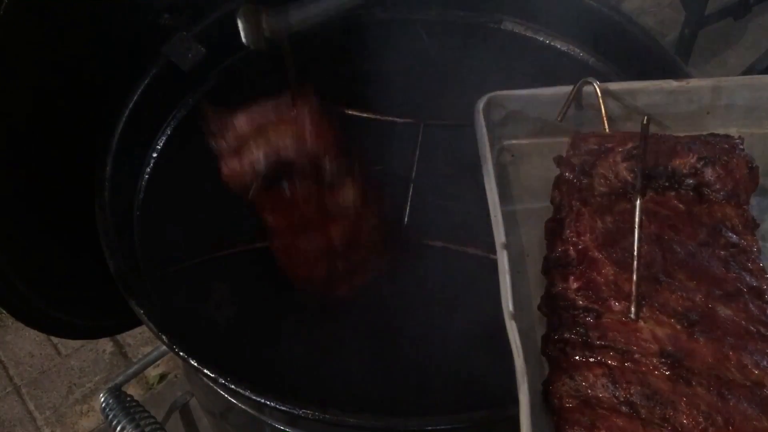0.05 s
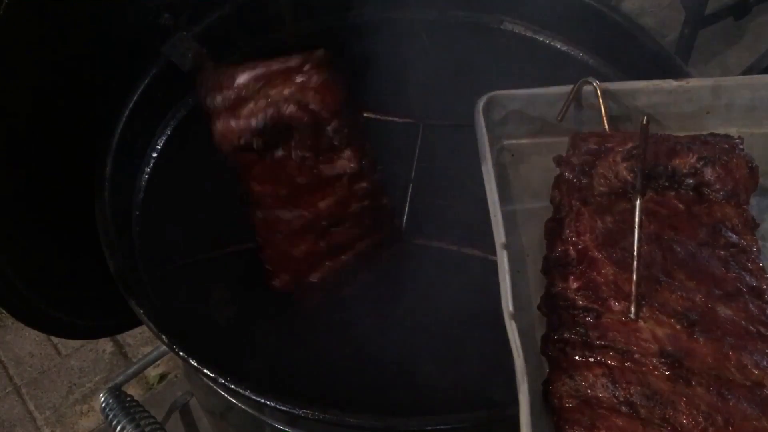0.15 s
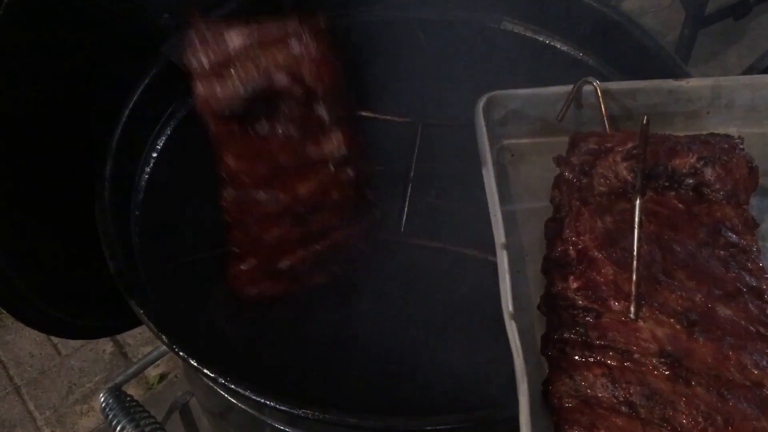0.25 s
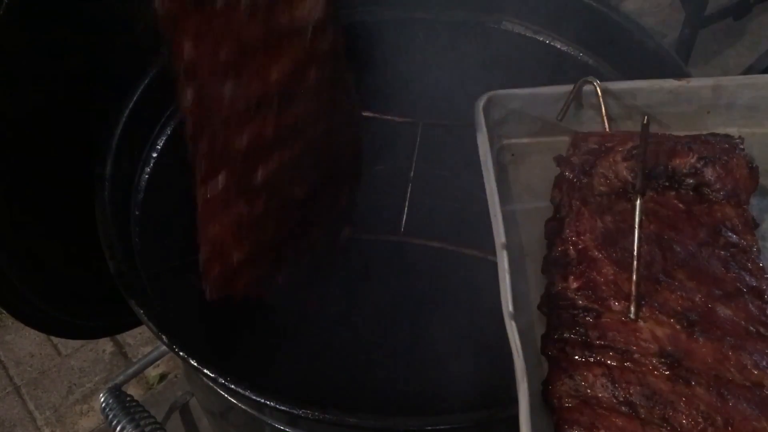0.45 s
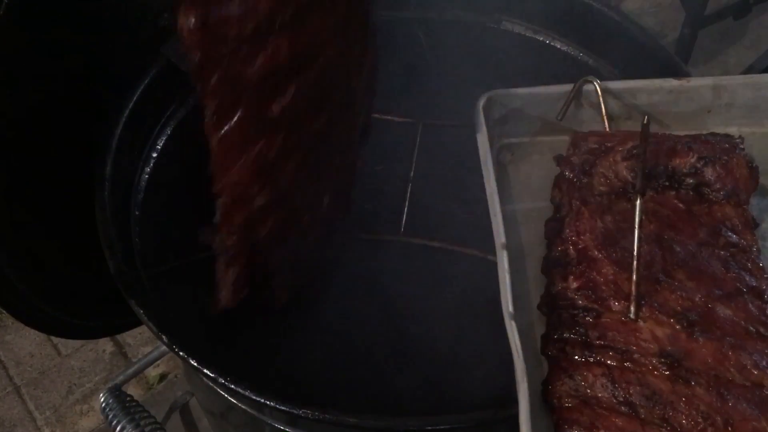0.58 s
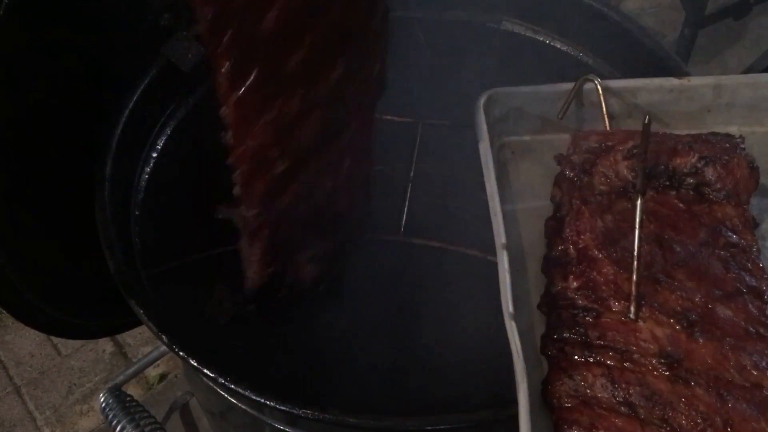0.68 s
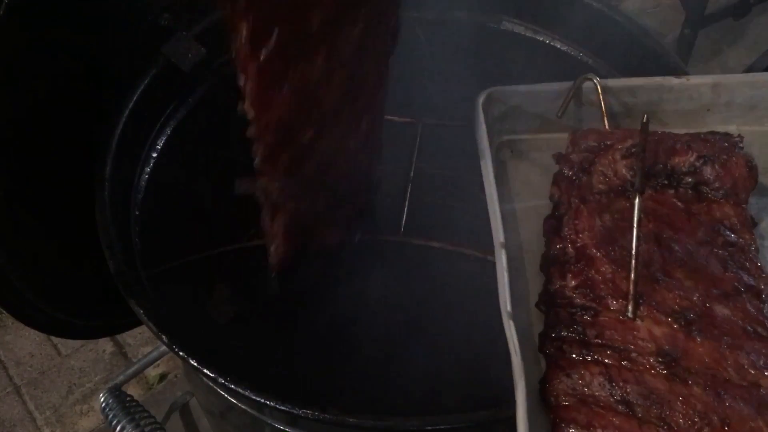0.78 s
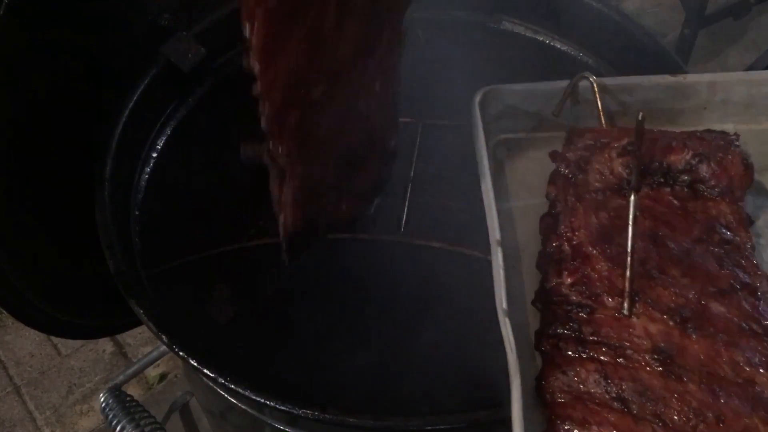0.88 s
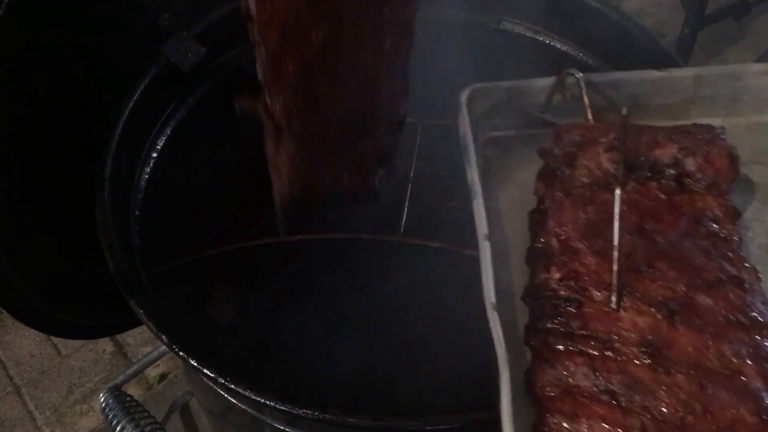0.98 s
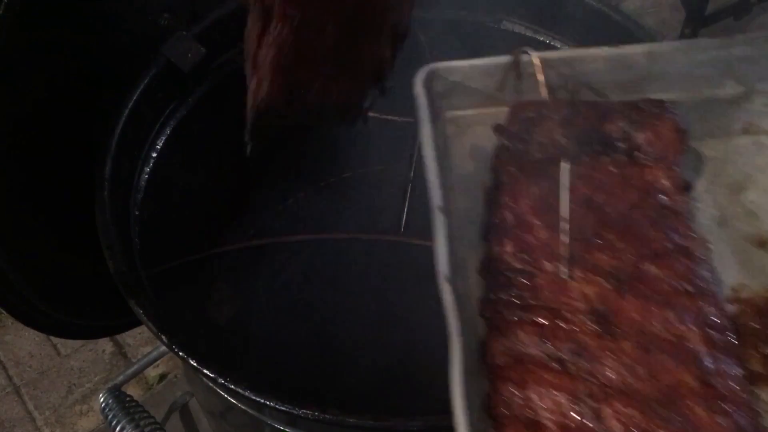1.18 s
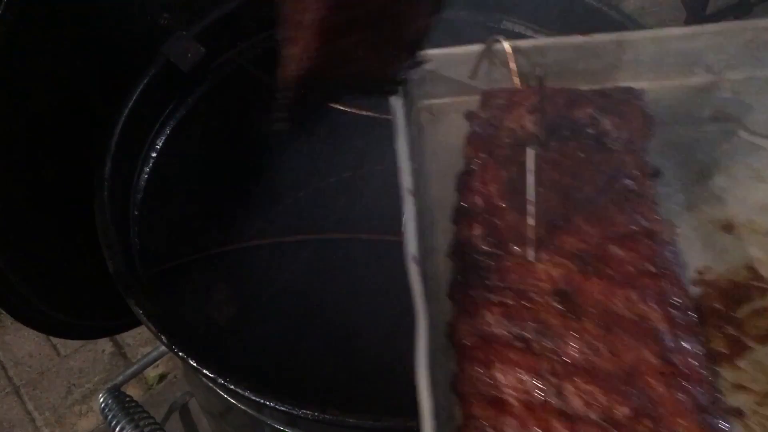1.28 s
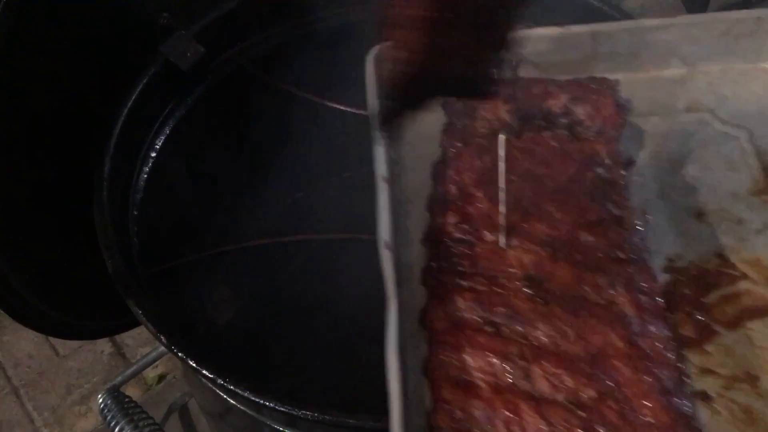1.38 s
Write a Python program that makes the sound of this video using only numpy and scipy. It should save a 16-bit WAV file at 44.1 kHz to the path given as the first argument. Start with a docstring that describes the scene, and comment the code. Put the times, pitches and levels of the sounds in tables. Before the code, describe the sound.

A metal hook clatters on a steel barrel, ringing, then clinks and soft rubbing, outdoors

```python
"""Hook knocks clatter on a hanging rod and set a steel barrel cooker ringing, outdoors, close to the microphone.
A rack of ribs is being lifted out: meat and air thump in the drum, and the hook clinks as it comes free.
A grainy rubbing hiss swells as meat and pan are moved, with a few brushes and a hollow drone of friction.
Steel blows are decaying noise plus wavering sine modes; the rest is shaped noise, over a low outdoor rumble."""
import sys
import numpy as np
from scipy import signal
from scipy.fft import rfft, irfft
from scipy.io import wavfile

SR = 44100
rng = np.random.default_rng(int(sys.argv[2]) if len(sys.argv) > 2 else 0)


def unload_audio(sound):
    """Save the sound as a 16-bit wav file, at the path given as the first command line argument."""
    columns = np.transpose(np.atleast_2d(sound))
    # keep every value between -1 and 1, then stretch to whole-number steps
    steps = np.round(np.clip(columns, -1, 1) * 32767)
    wavfile.write(sys.argv[1], SR, steps.astype(np.int16))


N = 63945
TIME, FREQ = np.arange(N) / SR, np.fft.rfftfreq(N, 1 / SR)


def amp(db):
    """Decibels to gain."""
    return 10 ** (np.asarray(db) / 20)


def unit(x):
    """Scales to rms 1."""
    return x / np.sqrt(np.mean(x ** 2) + 1e-20)


def read(points, hz):
    """Reads a table on a log-frequency axis."""
    f, value = np.transpose(points)
    return np.interp(np.log(hz + 1), np.log(f + 1), value)


def add(mix, s, sound):
    """Mixes a sound in at time s."""
    part = mix[max(round(s * SR), 0):][:len(sound)]
    part += sound[:len(part)]


def noise(gain):
    """Noise of rms 1 with the given gain at each frequency."""
    return unit(irfft(rfft(rng.standard_normal(N)) * gain, N))


def band(hz, width_hz):
    """Noise confined to one band; its gain is halved at width_hz either side of the centre."""
    return noise(1 / (1 + ((FREQ - hz) / width_hz) ** 4))


def swell(rise, decay):
    """A straight rise, then an exponential fall."""
    return np.minimum(TIME / rise, 1) * np.exp(-np.maximum(TIME - rise, 0) / decay)


def clatter():
    """The hook knocks on the rod and shakes the whole drum."""
    # knocks of the hook on rod and drum: start_s, level_db, rise_s, dull_above_hz
    knocks = [(.177, -25.5, 0.0054, 3320), (.218, -28.5, 0.0046, 2340), (.2452, -13, 0.0014, 6800),
              (.258, -17.5, 0.00067, 2770), (.2775, -19, 0.0015, 5500), (.286, -14.5, 0.00045, 16300),
              (.306, -18.5, 0.0011, 14200), (.3115, -15, 0.00043, 5730)]
    # dense overtones of the drum: frequency_hz, relative_db per Hz
    drum_spectrum = [(60, -21), (200, -15), (420, -7.5), (520, -16.5), (650, -0.5), (860, -3.5), (1120, -5),
                     (1800, 4), (2600, -1.5), (3700, 0), (4700, -8), (6200, -7.5), (7500, -10.5),
                     (9700, -6), (11500, -14.5), (15000, -8.5)]
    # ring time of those overtones: frequency_hz, t60_s
    drum_t60 = [(100, 1.8), (700, 2.22), (1500, 1.15), (3700, 0.87), (6000, 0.5), (12000, 0.28)]
    # clear modes of the drum: frequency_hz, relative_db, t60_s
    drum_modes = [(394, -19.5, 1.72), (574, -22, 2.67), (654.6, -9, .9), (697, -28.5, 2.7), (829, -3, 0.45),
                  (926, -7, 1.3), (1399.5, -2, 0.42), (1695, -5, .5), (1797, 4.5, 0.19), (1883, 5, 0.37),
                  (1988, 2, 0.22), (2340, 4.5, 0.16), (2468, 8, 0.17), (2666, -18, 0.45), (3370, 3, 0.25),
                  (3472, 5, 0.18), (3545, 5.5, 0.14), (4164, -24, 1), (4285, -4, 0.27), (5750, -14, 0.23),
                  (5940, 1, 0.13), (6180, 1, 0.21), (8800, -19, 0.23)]
    return struck(knocks, drum_spectrum, drum_t60, drum_modes, crash_db=1, wash_db=-16.0, modes_db=-18.0)


def hook():
    """The hook clinks and rings on above the open drum."""
    # clinks of the free hook: start_s, level_db, rise_s, dull_above_hz
    clinks = [(.4905, -24, 0.0011, 2180), (.6845, -26.5, 0.0012, 15000), (.6905, -20.5, 0.00084, 4900)]
    # dense overtones of the hook: frequency_hz, relative_db per Hz
    hook_spectrum = [(200, -31), (700, -13.5), (1400, -4.5), (2300, -2.5), (3200, -2), (3950, 5),
                     (4600, -15.5), (5500, -8.5), (6400, -3.5), (7400, -10), (8700, -5.5), (12000, -3),
                     (15500, -12)]
    # ring time of those overtones: frequency_hz, t60_s
    hook_t60 = [(500, 0.39), (1500, 0.67), (3700, 0.5), (9000, 0.37), (15000, 0.22)]
    # clear modes of the hook: frequency_hz, relative_db, t60_s
    hook_modes = [(1318, -7.5, 0.87), (1426, -13, .8), (1520, -5.5, 0.48), (1750, -6, 0.47),
                  (2406, -1, 0.36), (3020, -4.5, 0.19), (3740, 4.5, 0.21), (3874, 5, 0.1),
                  (3920, -10, 0.62), (5240, -8.5, 0.37), (6341, 1.5, 0.093), (6460, -8.5, 0.34),
                  (8060, -12, 0.3), (8850, -6, 0.36), (8700, -7, 0.15), (11940, -6, 0.18)]
    return struck(clinks, hook_spectrum, hook_t60, hook_modes, crash_db=-1, wash_db=-12.5, modes_db=-12)


def struck(blows, spectrum, t60, modes, crash_db, wash_db, modes_db):
    """Blows on a steel body: a short crash, a long wash and clear modes."""
    # the crash dies faster than the wash: frequency_hz, t60_s
    crash_t60 = [(300, 0.17), (2000, 0.2), (6000, 0.16), (14000, 0.096)]
    out = amp(modes_db) * ring(modes, blows)
    colour_db = read(spectrum, FREQ) + ripple()  # the same for every blow on this body
    for s, db, rise, dull_hz in blows:
        crash = amp(crash_db) * overtones(colour_db, crash_t60)
        wash = amp(wash_db) * overtones(colour_db, t60)
        add(out, s, contact(crash + wash, db, rise, dull_hz))
    return out


def overtones(spectrum_db, t60):
    """Countless overlapping modes, as noise with each band dying at its own speed."""
    hz, t, z = signal.stft(noise(amp(spectrum_db)), SR, nperseg=256)
    decay = np.exp(-np.log(1000) * t / read(t60, hz)[:, None])
    return signal.istft(z * decay, SR, nperseg=256)[1][:N]


def ring(modes, blows, waver=0.58, waver_hz=45):
    """Each blow adds energy to the clear modes, which waver as they die away."""
    hz, db, t60 = np.transpose(modes)[:, :, None]
    power = 0
    for s, level_db, rise, dull_hz in blows:
        t = np.maximum(TIME - s, 0)
        envelope = amp(level_db) * (1 - np.exp(-t / rise)) * np.exp(-np.log(1000) * t / t60)
        power = power + envelope ** 2 / (1 + (hz / dull_hz) ** 2)
    angle = 2 * np.pi * (hz * TIME + rng.random((len(modes), 1)))
    # two random drifts per mode bend both its strength and its phase
    knots = rng.standard_normal((2 * len(modes), 400))
    drift = waver * np.array([np.interp(TIME * waver_hz, np.arange(len(k)), k) for k in knots])
    waves = (1 + drift[::2]) * np.sin(angle) + drift[1::2] * np.cos(angle)
    return (amp(db) * np.sqrt(power) * waves).sum(0)


def contact(sound, db, rise, dull_hz):
    """A blow builds up over its rise time constant and loses treble above dull_hz."""
    b, a = signal.butter(1, min(dull_hz, SR / 2 - 500), fs=SR)
    return amp(db) * signal.lfilter(b, a, sound * (1 - np.exp(-TIME / rise)))


def ripple():
    """Random peaks and dips among a body's overtones, in dB; they lie wider apart in the treble."""
    depth_db, spacing_hz = 4, 26.23  # spacing of the random steps at 1 kHz
    steps = rng.standard_normal(4000)
    place = 2 * np.sqrt(1000 * FREQ) / spacing_hz
    return depth_db * np.interp(place, np.arange(len(steps)), np.clip(steps, -2, 2))


def bumps():
    """Meat bumps the drum wall, stirring one damped band at a time."""
    # bumps, level ahead of the wall filter: start_s, level_db, rise_s, centre_hz, decay_s
    meat_bumps = [(.2, -22.5, 0.00086, 794, 0.0074), (.213, -30.5, 0.0018, 830, 0.04),
                  (.254, -16.5, 0.0029, 784, 0.009), (.362, -24.5, 0.0011, 874, 0.013),
                  (.510, -36, .006, 1660, 0.045), (.521, -30, .006, 963, 0.02)]
    return thuds(meat_bumps, half_width=0.2)


def thumps():
    """The air in the drum thumps dully, in broader bands for their pitch."""
    # thumps, level ahead of the wall filter: start_s, level_db, rise_s, centre_hz, decay_s
    air_thumps = [(.265, -42.5, .012, 92, 0.052), (.34, -36.5, 0.007, 88.6, 0.051),
                  (.515, -43.5, 0.0048, 382, 0.054), (.56, -36.5, 0.013, 90, 0.03)]
    return thuds(air_thumps, half_width=0.37)


def thuds(rows, half_width):
    """Soft blows that stir only one damped band of the drum; half_width is a share of its centre."""
    out = np.zeros(N)
    for s, db, rise, hz, decay in rows:
        push = amp(db) * swell(rise, decay) * band(hz, half_width * hz)
        # an octave-wide filter around the centre
        wall = signal.butter(2, [hz / np.sqrt(2), hz * np.sqrt(2)], "bandpass", fs=SR, output="sos")
        add(out, s, signal.sosfilt(wall, push))
    return out


def snaps(width_hz=2800):
    """Tiny wet snaps and bright ticks: bursts of treble noise that start at once and die fast."""
    # snaps and ticks: start_s, level_db, decay_s, centre_hz
    ticks = [(.2045, -29, 0.0012, 11300), (0.2451, -25.5, .005, 11600), (0.2765, -30, 0.012, 12500),
             (.286, -45, .006, 12600), (0.305, -27, .006, 13400), (0.6843, -28.5, 0.0082, 5300),
             (.803, -42, 0.0017, 11100), (1.082, -35, 0.0048, 13100)]
    out = np.zeros(N)
    for s, db, decay, hz in ticks:
        add(out, s, amp(db) * np.exp(-TIME / decay) * band(hz, width_hz))
    return out


def rubbing(grains_per_s=14000):
    """A fine-grained hiss swells as meat and pan are moved, with a few stronger brushes."""
    # colour of the hiss: frequency_hz, relative_db per Hz
    hiss_spectrum = [(100, 4), (500, -1.5), (1000, 4), (2000, 3), (2900, -1.5), (3600, 2), (4900, -10),
                     (5900, 2.5), (7500, -5), (9300, 2.5), (10500, -9), (12500, -1), (15500, -1.5)]
    # level of the hiss: time_s, level_db
    hiss_level = [(0, -71), (.9, -68), (1.03, -49), (1.16, -46), (1.2, -51), (1.26, -42), (1.4, -39),
                  (1.45, -40)]
    # brushes of meat and pan: start_s, level_db, rise_s, decay_s
    brushes = [(0.998, -53, 0.012, 0.014), (1.157, -39, 0.01, 0.0054), (1.224, -36, 0.0052, 0.01),
               (1.266, -37.5, 0.0075, 0.019), (1.336, -41.5, 0.0064, 0.075)]
    # colour of the brushes: frequency_hz, relative_db per Hz
    brush_spectrum = [(200, 4.5), (700, -9.5), (1400, 2.5), (2000, 1), (2900, -14.5), (4000, -9.5),
                      (5900, -0.5), (7500, -11.5), (9500, -2.5), (15000, -13)]
    ripple_db = ripple()
    grains = rng.standard_normal(N) * (rng.random(N) < grains_per_s / SR)
    hiss = unit(irfft(rfft(grains) * amp(read(hiss_spectrum, FREQ) + ripple_db), N))
    out = hiss * amp(np.interp(TIME, *np.transpose(hiss_level)))
    for s, db, rise, decay in brushes:
        brush = noise(amp(read(brush_spectrum, FREQ) + ripple_db))
        add(out, s, amp(db) * swell(rise, decay) * brush)
    return out


def pan():
    """Friction swells and fades in the hollow resonances of the pan."""
    # low swells and resonances: centre_s, spread_s, level_db, frequency_hz, width_hz
    pan_rubs = [(0.98, 0.22, -53, 70, 11), (1.324, 0.079, -45, 297, 46), (1.36, 0.12, -47.5, 190, 280),
                (1.386, 0.02, -44, 940, 86), (1.015, .015, -53.5, 1570, 250)]
    out = np.zeros(N)
    for s, spread, db, hz, width in pan_rubs:
        hollow = noise(1 / (1 + (2 * (FREQ - hz) / width) ** 2))
        out += amp(db) * np.exp(-.5 * ((TIME - s) / spread) ** 2) * hollow
    return out


def outdoor_air():
    """Steady noise, strongest in the bass: the low rumble of the outdoor background."""
    # colour of the background: frequency_hz, relative_db per Hz
    air_spectrum = [(24, -37), (40, -4.5), (60, -2), (100, -3), (200, -13), (500, -22), (1000, -18.5),
                    (2500, -25), (3400, -25), (3950, -19.5), (4600, -25.5), (9000, -25.5), (15000, -24.5)]
    return amp(-51.0) * noise(amp(read(air_spectrum, FREQ)))


def scene():
    """All sources over the outdoor background, the same in both channels."""
    mono = clatter() + hook() + bumps() + thumps() + snaps() + rubbing() + pan() + outdoor_air()
    return np.array([mono, mono])


def record(dry):
    """The recorder's band limit: a steep low-pass."""
    edge_hz = 15900
    lowpass = signal.firwin(511, edge_hz, window=("kaiser", 9), fs=SR)
    return signal.oaconvolve(dry, lowpass[None], "same")


dry = scene()
out = record(dry)
unload_audio(out)
```